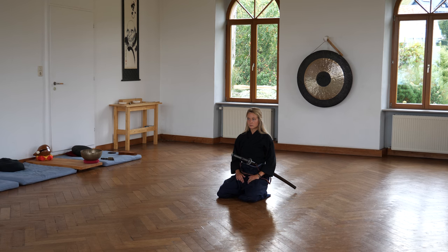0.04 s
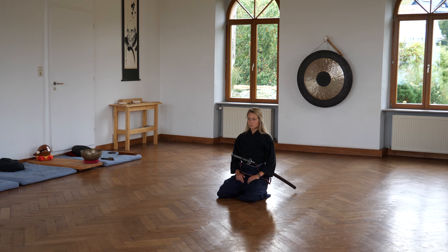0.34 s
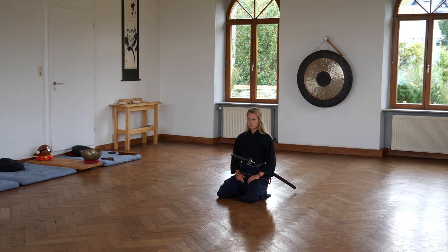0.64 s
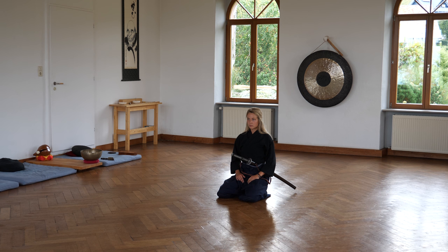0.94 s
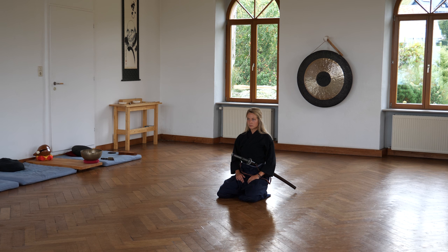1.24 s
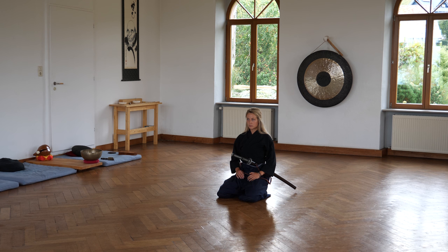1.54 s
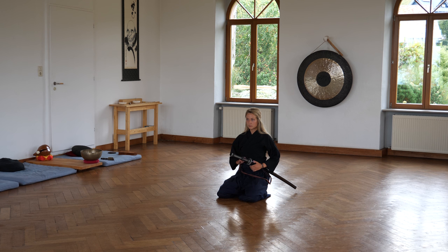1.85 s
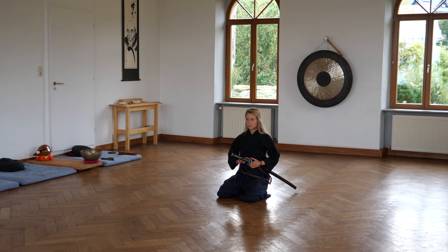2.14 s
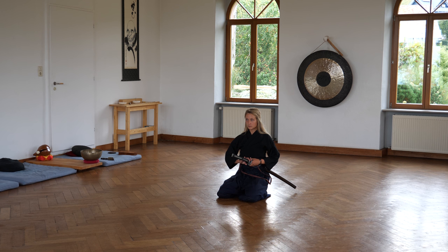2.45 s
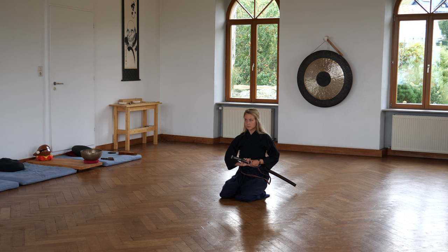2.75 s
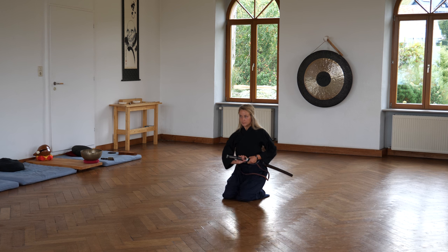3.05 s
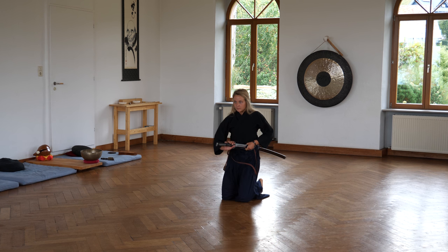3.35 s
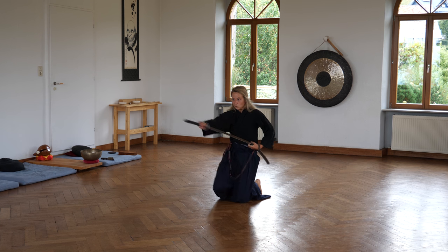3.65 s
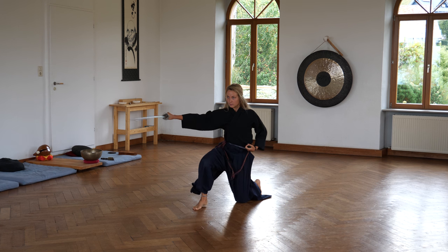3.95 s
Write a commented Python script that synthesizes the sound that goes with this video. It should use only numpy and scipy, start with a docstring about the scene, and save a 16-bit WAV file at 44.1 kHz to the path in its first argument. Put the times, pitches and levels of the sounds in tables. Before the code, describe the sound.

A sword is drawn from a wooden scabbard in a quiet, echoing hall, a few metres from the microphone. After faint hiss and a soft hand pat, cloth rustles, the blade scrapes and knocks free, and a foot thumps down.

```python
"""A quiet, echoing hall with a wooden floor, the microphone a few metres from a kneeling swordswoman.
Her hands pat onto hilt and scabbard, a sleeve swishes and her wide trousers rustle as she rises.
The blade scrapes and knocks along the hollow wooden scabbard, its tip clicks free and rings faintly,
and a foot lands on the boards. Low room tone and microphone hiss lie underneath."""
import sys
import numpy as np
from scipy import signal
from scipy.fft import rfft, irfft
from scipy.io import wavfile

SR = 44100
rng = np.random.default_rng(int(sys.argv[2]) if len(sys.argv) > 2 else 0)


def wrap_up_sound(samples):
    """Save the sound to the file named by the first command line argument, as 16-bit audio."""
    columns = np.atleast_2d(samples).T
    # keep every value between -1 and 1, then stretch to whole-number steps
    tamed = np.clip(columns, -1, 1)
    steps = np.round(tamed * 32767).astype(np.int16)
    wavfile.write(sys.argv[1], SR, steps)


N = 176400
T = np.arange(N) / SR


# blade striking the scabbard: start_s, relative_db, tilt_db_per_octave, direct_db
KNOCKS = [(3.3506, -32.5, -1.5, -3), (3.3815, -42.5, -13, 0.5), (3.418, -49, 12, -3), (3.4623, -47, -10, 0),
          (3.502, -34.5, -1.5, 3), (3.5045, -29.5, 2.5, 5.5), (3.511, -46, -1, -1), (3.5366, -38, 0, -12),
          (3.648, -50, 6, -3), (3.6505, -21.5, -3, 4), (3.657, -30.5, -3.5, 2), (3.7102, -25.5, -3.5, -3.5)]

def blade_knocks():
    """The blade knocks on the wood; less direct sound reaches the microphone when her body shields it."""
    return scabbard_body(blows(KNOCKS, t60_s=0.017, wet_db=2.5))


# blade sliding on wood: time_s, relative_db
SLIDE = [(3.3, -115), (3.36, -61), (3.41, -66), (3.46, -46), (3.53, -43), (3.6, -37), (3.64, -42),
         (3.69, -40), (3.75, -40), (3.8, -40.5), (3.86, -45), (3.95, -54)]

def blade_scrape():
    """The blade sticks and slips along the scabbard, swelling as it is drawn, then easing off."""
    return scabbard_body(friction(slips_per_s=1300, scatter_db=5) * curve(SLIDE))


# resonances of the scabbard: pitch_hz, width_hz, peak_db
SCABBARD_MODES = [(601, 16, -3), (1072, 96, 1.5), (1520, 363, 0.5), (1684, 174, 3.5), (2040, 250, -4.5),
                  (2470, 530, -1), (3460, 380, -15), (4360, 300, -12.5), (5200, 1000, -28)]
# tone of the wood between them: frequency_hz, gain_db
WOOD_COLOUR = [(60, -15), (250, -11), (450, -9.5), (750, -2), (2000, 0), (3000, -7), (6000, -13),
               (8500, -28), (11000, -44), (15000, -53)]

def scabbard_body(force):
    """The hollow wooden scabbard resonates, shaken by the blade."""
    modes = [(hz, db + 20 * np.log10(width), np.log(1000) / (np.pi * width))
             for hz, width, db in SCABBARD_MODES]
    return through(force, ringing(modes)) + undb(-5.5) * colour(force, WOOD_COLOUR)


# steel touching the scabbard's mouth: start_s, level_db
TICKS = [(3.577, -63), (3.587, -60), (3.597, -54), (3.649, -57), (3.722, -60), (3.737, -45), (3.803, -59)]
# its bright tone: frequency_hz, gain_db
TICK_COLOUR = [(1000, -40), (4000, -22), (6500, -13), (8000, -9), (8900, 4), (9900, -12), (10700, -20),
               (11700, -12), (13000, -22), (15500, -18)]

def steel_ticks():
    """The steel clicks lightly against the scabbard's mouth on its way out."""
    return colour(bursts(TICKS, t60_s=0.04), TICK_COLOUR)


# modes of the freed blade: pitch_hz, relative_db, t60_s
BLADE_MODES = [(4648, -1, .6), (4672, 0, .6), (4720, -7, .3), (5120, -9, .4), (5755, -5, .3),
               (6215, -6, .3), (6250, -4, .3), (6310, -5, .3), (7154, -12, .3), (8183, -14, .3),
               (8850, -13, .2), (11750, -19, .2)]

def blade_ring(free_s=3.745, gain_db=-54):
    """The steel rings faintly once its tip is free."""
    t = T - free_s
    return sum(undb(gain_db + db) * fade(t, t60) * np.sin(2 * np.pi * hz * t)
               for hz, db, t60 in BLADE_MODES)


# knees shift, then the foot lands and her weight follows: start_s, relative_db
STEPS = [(3.078, -55), (3.33, -51), (3.362, -46), (3.432, -60), (3.497, -51), (3.883, -36), (3.911, -31.5),
         (3.939, -29), (3.98, -32)]
# modes of the floorboards: pitch_hz, relative_db, t60_s
BOARD_MODES = [(81, -3, 0.15), (133, -0.5, 0.08), (216, 2, 0.087), (269, 4, 0.096), (334, -4, .07),
               (595, -5, 0.094)]
# dull thud of the contact: frequency_hz, gain_db
THUD_COLOUR = [(30, -34), (55, -13), (85, -0.5), (300, 2.5), (550, -9), (1000, -32), (3000, -25.5),
               (15000, -45)]

def steps():
    """Knees and foot thump the floorboards and set them ringing."""
    force = bursts(STEPS, t60_s=0.053)
    return through(force, ringing(BOARD_MODES)) + undb(-2) * colour(force, THUD_COLOUR)


# hands meeting the sword: start_s, relative_db, tilt_db_per_octave, direct_db
PATS = [(2.0375, -42.5, 1.5, -4.5), (2.0525, -57, -2.5, 4), (2.085, -52.5, 3, 4), (2.089, -54.5, 2, 7.5),
        (2.093, -48.5, -2, -10), (2.106, -48, -4.5, -7)]
# palm on cloth and wood: frequency_hz, gain_db
PAT_COLOUR = [(80, -22), (220, -10), (380, -2), (600, 1), (800, -1), (1150, 1), (2400, -9), (4300, -16),
              (7000, -28), (15000, -45)]

def hand_pats():
    """Soft palms close on hilt and scabbard with dull pats."""
    return colour(blows(PATS, t60_s=0.021, wet_db=1.5), PAT_COLOUR)


# rubbing of sleeve, trousers and sole: time_s, relative_db
SLEEVE = [(1.35, -100), (1.64, -73.5), (1.8, -86), (2.2, -74.5), (2.55, -75.5), (2.66, -61.5), (2.77, -61),
          (2.88, -62.5), (3.0, -69.5), (3.3, -66.5), (3.45, -56), (3.75, -44), (4, -74)]
TROUSERS = [(2.7, -79), (3.02, -66), (3.085, -54.5), (3.2, -55.5), (3.3, -58), (3.4, -56), (3.5, -42.5),
            (3.58, -53.5), (3.67, -49.5), (3.82, -48), (4, -49.5)]
SOLE = [(3.87, -111), (3.886, -47), (3.915, -55), (3.95, -62), (4, -75)]
# tone of each: frequency_hz, gain_db
SLEEVE_COLOUR = [(100, -15), (400, -0.5), (800, -1.5), (1150, 0), (2000, -4), (3000, -8), (4200, -9.5),
                 (6500, -18), (9000, -22), (15000, -38)]
TROUSER_COLOUR = [(35, -30), (80, -5), (150, -4.5), (260, 1), (420, -2), (600, -2.5), (850, -7), (1300, -7),
                  (2200, -16), (3200, -22), (7000, -29.5), (15000, -54)]
SOLE_COLOUR = [(300, -6), (2000, 1), (4300, 7), (6500, 2.5), (10000, -6), (15000, -15)]

def rustle():
    """Cloth and skin catch and slip as she moves."""
    surfaces = (SLEEVE, SLEEVE_COLOUR), (TROUSERS, TROUSER_COLOUR), (SOLE, SOLE_COLOUR)
    return sum(colour(friction(slips_per_s=3500, scatter_db=2.5) * curve(levels), tone)
               for levels, tone in surfaces)


# decay of the hall: frequency_hz, t60_s
HALL_DECAY = [(100, 1.48), (400, 1.52), (1200, 1.45), (3000, 1.73), (6000, 1.24), (14000, 0.46)]

def reverb(x, gap_s=0.0037, early_db=-11, early_t60_s=0.05):
    """First reflections from floor and near wall, and a diffuse tail whose treble dies first."""
    t = T[:SR]
    noise = rfft(rng.standard_normal(SR))
    hz = np.arange(SR // 2 + 1)
    octave = np.round(np.log2(np.clip(hz, 64, 16384)))
    tail = sum(irfft(noise * (octave == k), SR) * fade(t - gap_s, on_log(2 ** k, HALL_DECAY))
               for k in np.unique(octave))
    return through(x, tail * (1 + undb(early_db) * fade(t, early_t60_s)))


def hall(x, wet_db):
    """The microphone hears the direct sound plus the hall's answer."""
    return x + undb(wet_db) * reverb(x)


# low rumble and distant rush: time_s, level_db
RUMBLE = [(0, -70), (1.1, -70), (1.35, -71.5), (2, -69.5), (4, -68.5)]
RUSH = [(0, -70.5), (.6, -75), (1.1, -74.5), (1.4, -97), (2, -90)]
# tone of each: frequency_hz, gain_db
RUMBLE_COLOUR = [(20, -24), (45, -5.5), (70, 0.5), (100, -2), (145, -0.5), (190, -9), (340, -8), (600, -13),
                 (1000, -17), (1400, -21), (2000, -26.5), (6000, -43)]
RUSH_COLOUR = [(50, -9.5), (120, 1), (230, -1), (400, 2.5), (600, -9), (900, -10.5), (1500, -18),
               (3000, -20.5), (8000, -48)]

def room_tone(whine_hz=1140, whine_width_hz=45, whine_db=-81):
    """A low rumble, a distant rush that dies away and a thin, steady whine."""
    rumble, rush, whine = rng.standard_normal((3, N))
    narrow_band = T * np.exp(-np.pi * whine_width_hz * T) * np.sin(2 * np.pi * whine_hz * T)
    return (colour(rumble, RUMBLE_COLOUR) * curve(RUMBLE)
            + colour(rush, RUSH_COLOUR) * curve(RUSH)
            + undb(whine_db) * through(whine, narrow_band))


# hiss common to both channels: frequency_hz, gain_db
HISS_COLOUR = [(100, 3), (2000, -3), (5000, -3.5), (10000, -5), (15500, -3.5)]

def microphone_hiss(mid_db=-73):
    """The microphone's own steady noise, wider in the treble."""
    mid, side = rng.standard_normal((2, N))
    mid = colour(mid, HISS_COLOUR)
    side = colour(side, [(30, 5), (100, -0.5), (500, -1.5), (2000, -6.5), (6000, 1), (13000, 2)])
    return undb(mid_db) * (mid + undb(-5.5) * np.array([side, -side]))


def blows(rows, t60_s, wet_db):
    """Short contacts, each with its own brightness; shielded ones are heard mostly through the hall."""
    t = T[:4096]
    hz = np.fft.rfftfreq(len(t), 1 / SR)
    octaves = np.log2(np.clip(hz, 800, 6400) / 1600)
    direct, into_hall = np.zeros((2, N + len(t)))
    for start_s, db, tilt, direct_db in rows:
        noise = irfft(rfft(rng.standard_normal(len(t))) * undb(tilt * octaves))
        force = noise * undb(db) * fade(t, t60_s)
        span = slice(int(start_s * SR), int(start_s * SR) + len(t))
        direct[span] += undb(direct_db) * force
        into_hall[span] += force
    return direct[:N] + undb(wet_db) * reverb(into_hall[:N])


def bursts(rows, t60_s):
    """A short, rough contact for each start_s, level_db row."""
    return rng.standard_normal(N) * sum(undb(db) * fade(T - start_s, t60_s) for start_s, db in rows)


def friction(slips_per_s, scatter_db):
    """Dense tiny slips of uneven size, at rms 1."""
    slips = rng.random(N) < slips_per_s / SR
    direction = np.sign(rng.standard_normal(N))
    size = undb(scatter_db * np.minimum(rng.exponential(size=N), 4))
    force = slips * direction * size
    return force / np.sqrt(np.mean(force ** 2))


def ringing(modes):
    """Response of damped modes to one blow."""
    t = T[:SR]
    return sum((-1) ** k * undb(db) * fade(t, t60) * np.sin(2 * np.pi * hz * t)
               for k, (hz, db, t60) in enumerate(modes))


def colour(x, rows, size=4096):
    """Causal filter of unit energy, shaped by frequency_hz, gain_db rows."""
    hz = np.arange(size // 2 + 1) * SR / size
    cepstrum = irfft(np.log(undb(on_log(hz, rows))))
    cepstrum[1:size // 2] *= 2  # fold to minimum phase, keeping attacks sharp
    cepstrum[size // 2 + 1:] = 0
    return through(x, irfft(np.exp(rfft(cepstrum))))


def through(x, response):
    """Convolve with a response scaled to unit energy."""
    return signal.fftconvolve(x, response / np.linalg.norm(response))[:N]


def on_log(hz, rows):
    """Read frequency_hz, value rows on a log-frequency axis."""
    row_hz, value = np.array(rows).T
    return np.interp(np.log(np.maximum(hz, 1)), np.log(row_hz), value)


def curve(rows):
    """Gain over time from time_s, level_db rows."""
    return undb(np.interp(T, *np.array(rows).T))


def fade(t, t60_s):
    """Exponential decay, silent before time zero."""
    return (t >= 0) * np.exp(-np.log(1000) * np.maximum(t, 0) / t60_s)


def undb(db):
    """Decibels to gain."""
    return 10 ** (np.asarray(db) / 20)


def scene():
    """Every movement comes from the middle of the hall, centred in front of the microphone."""
    cloth, hands, knocks, ticks = rustle(), hand_pats(), blade_knocks(), steel_ticks()
    moves = (undb(-3.5) * knocks + undb(-0.5) * hands  # these already carry the hall
             + undb(-2) * hall(cloth, wet_db=0.5)
             + undb(-7) * hall(blade_scrape(), wet_db=-5)
             + hall(ticks, wet_db=-12)
             + hall(blade_ring(), wet_db=-2)
             + undb(-1) * hall(steps(), wet_db=-1))
    return moves + room_tone() + microphone_hiss()


def record(dry):
    """The recorder cuts the highest treble steeply."""
    top_hz = 15550
    return signal.sosfilt(signal.ellip(12, .1, 70, top_hz, fs=SR, output="sos"), dry)


dry = scene()
out = record(dry)
wrap_up_sound(out)
```